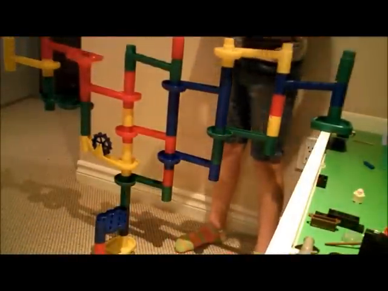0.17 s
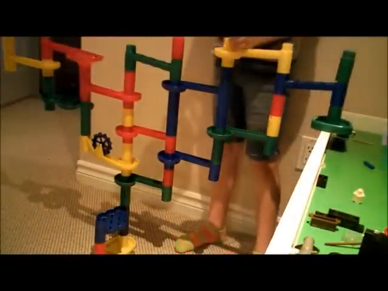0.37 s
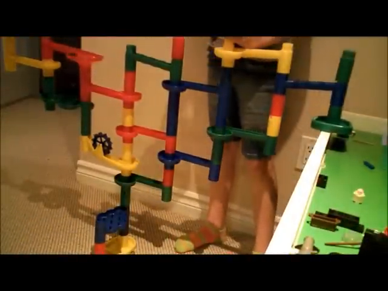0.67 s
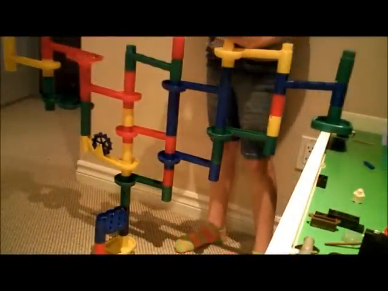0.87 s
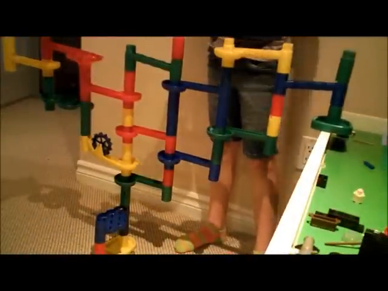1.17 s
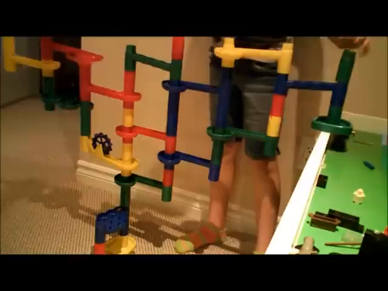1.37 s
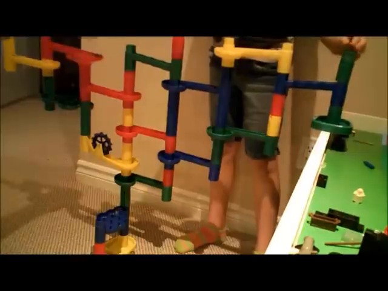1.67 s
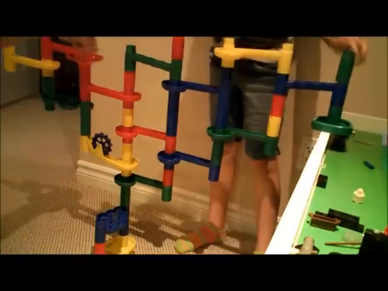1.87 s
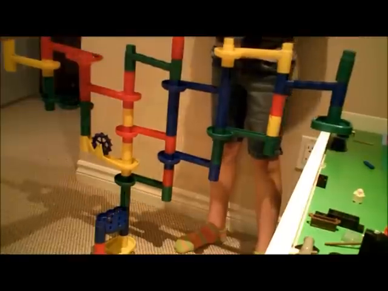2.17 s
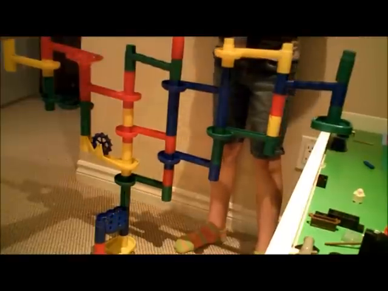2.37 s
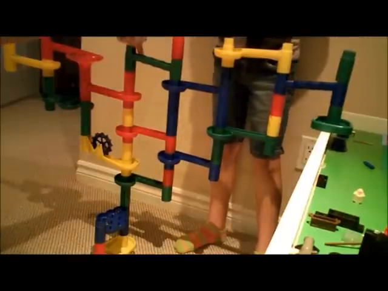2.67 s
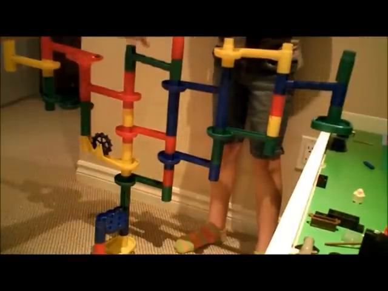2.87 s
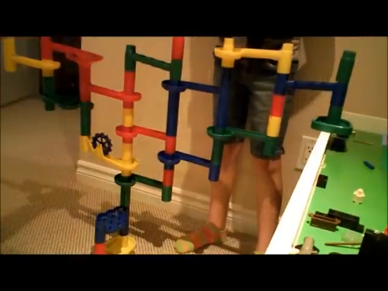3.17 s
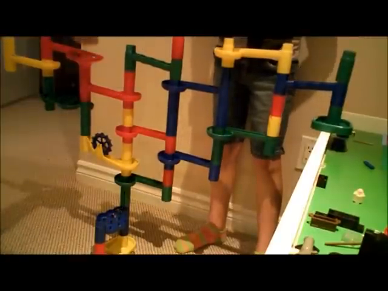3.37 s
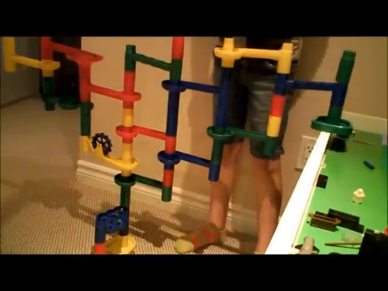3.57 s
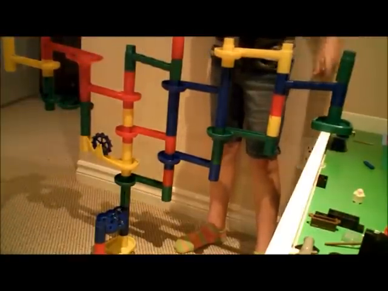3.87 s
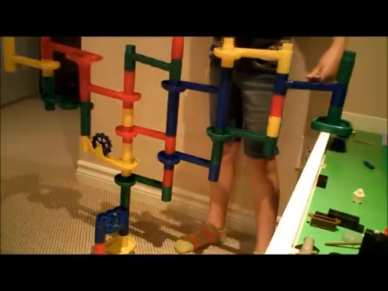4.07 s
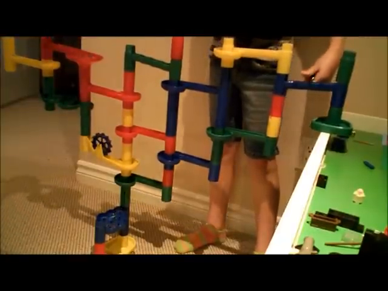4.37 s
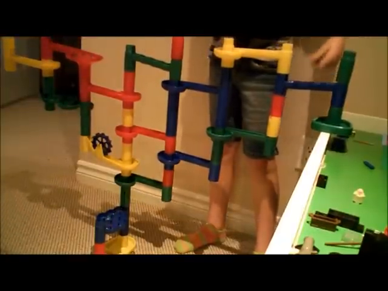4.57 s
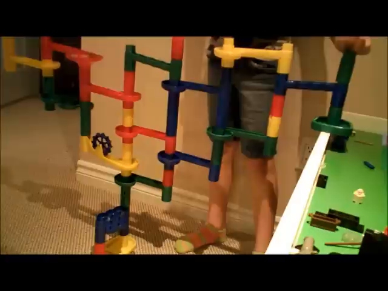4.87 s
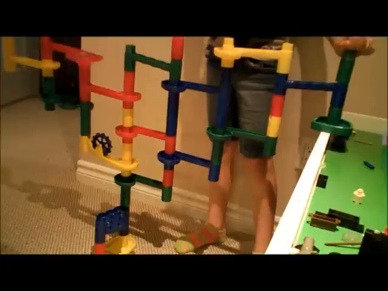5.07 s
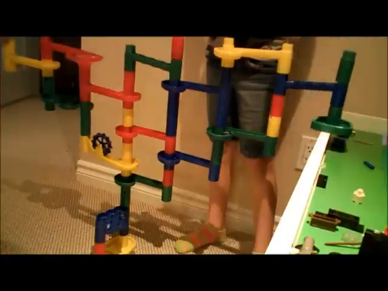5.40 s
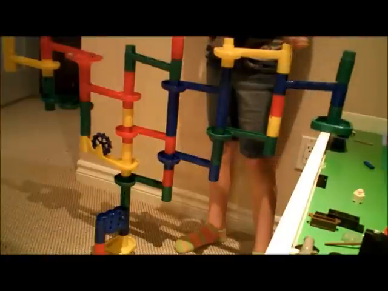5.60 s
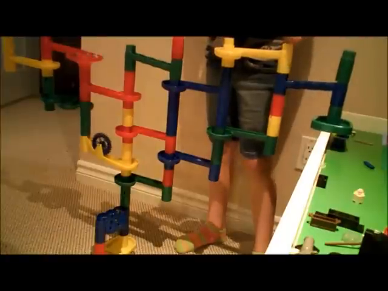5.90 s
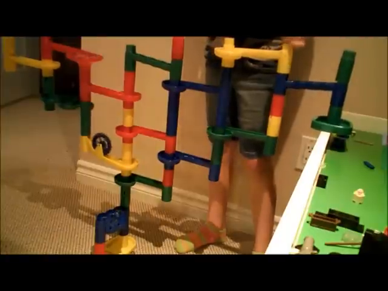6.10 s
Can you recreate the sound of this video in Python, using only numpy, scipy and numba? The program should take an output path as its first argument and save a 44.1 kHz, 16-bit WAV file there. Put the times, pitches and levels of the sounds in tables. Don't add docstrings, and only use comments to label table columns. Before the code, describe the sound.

Several glass marbles tumble through a hollow plastic run indoors. Brief clicks open quietly, then bursts of hard clacks, short rolling rattles and hollow pops gather from about one second. A marble whirs around a funnel midway, a tiny joint squeak comes later, and clatter thickens toward the end. Small carpeted room, camera microphone a couple of metres away, bright and short-echoed.

```python
import sys
import numpy as np
from scipy import signal
from scipy.fft import rfft, irfft
from scipy.io import wavfile
from scipy.ndimage import uniform_filter1d
from numba import njit

SR = 44100
rng = np.random.default_rng(int(sys.argv[2]) if len(sys.argv) > 2 else 0)


def how_loud(loudness_db):
    steps = np.asarray(loudness_db, float) / 20
    return 10 ** steps


def pcm_store(signal):
    levels = np.round(np.clip(np.atleast_2d(signal), -1, 1) * 32767)
    wavfile.write(sys.argv[1], SR, levels.astype(np.int16).T)


N = 275184


def read(table, hz):
    f, v = np.transpose(table)
    return np.interp(np.log(np.maximum(hz, 1)), np.log(f), v)


def curve(table):
    s, *cols = np.transpose(table)
    return [np.interp(np.arange(N) / SR, s, c) for c in cols]


def samples(s):
    return (s * SR).astype(np.int64)


def during(table):
    t = np.arange(N) / SR
    return (t > table[0][0]) * (t < table[-1][0])


def colour(x, table):
    gain = how_loud(read(table, np.fft.rfftfreq(len(x), 1 / SR)))
    y = irfft(rfft(x) * gain, len(x))
    return y / np.std(y)


@njit
def svf(x, hz, width):
    y, b, l = np.empty(len(x)), 0., 0.
    for i in range(len(x)):
        g, k = np.tan(np.pi * hz[i] / SR), width / hz[i]
        v = (b + g * (x[i] - l)) / (1 + g * (g + k))
        b, l, y[i] = 2 * v - b, l + 2 * g * v, k * v
    return y


@njit
def ring(start, hz, gain, t60, rise):
    y = np.zeros(N)
    for k in range(len(hz)):
        p = np.exp(2j * np.pi * hz[k] / SR - np.log(1000) / (t60[k] * SR))
        z, lag, q = gain[k] + 0j, 1., np.exp(-1 / (rise[k] * SR))
        for i in range(start[k], min(N, start[k] + int(t60[k] * SR))):
            z, lag = z * p, lag * q
            y[i] += z.imag * (1 - lag)
    return y


def bounces(s, gap, count):
    steps = gap * (.3 + 1.4 * rng.random((len(s), count)))
    return np.cumsum(steps, 1) - steps[:, :1]


def piece(s, db, bounce, lo_hz, hi_hz, cycles, rise, count):
    bounce_db_per_s = 420
    where, size, pick, long = np.moveaxis(rng.random((len(s), 4, count)), 1, 0)
    hz = lo_hz * (hi_hz / lo_hz) ** ((np.arange(count) + where) / count)
    which = (pick ** 1.5 * bounce.shape[1]).astype(int)
    late = np.take_along_axis(bounce, which, 1)
    start = samples(s[:, None] + late)
    gain = how_loud(db[:, None] - 9 * size - bounce_db_per_s * late) / np.sqrt(count)
    t60 = cycles / hz * (.5 + long)
    flat = [a.ravel() for a in (start, hz, gain, t60)]
    return ring(*flat, np.full(hz.size, rise))


def chatter(rate, spread_db):
    hit = rng.random(N) < rate / SR
    strength_db = spread_db * np.minimum(rng.exponential(size=N), 3)
    return hit * rng.choice([-1, 1], N) * how_loud(strength_db)


# (frequency [Hz], density [dB per Hz])
AIR_SPECTRUM = [(20, -43), (120, -10.5), (300, -2), (1500, -10), (5000, -48), (10000, -40), (16000, -50)]


def air():
    return how_loud(-66.5) * colour(rng.standard_normal(N), AIR_SPECTRUM)


# (time [s], pitch [Hz], level [dB])
SQUEAK_PATH = [
    (4.281, 1092, -53),
    (4.289, 1054, -42),
    (4.305, 1090, -37),
    (4.314, 1090, -42),
    (4.33, 1116, -54),
    (4.34, 1080, -63),
]
# (multiple of pitch, level [dB])
SQUEAK_HARMONICS = [(1, 0), (2, -6), (3, -19), (4, -18), (6, -34), (7, -33), (8, -33)]


def squeak():
    hz, db = curve(SQUEAK_PATH)
    wobble = uniform_filter1d(rng.standard_normal((9, N)), 130) * np.sqrt(130)
    phase = 2 * np.pi * np.cumsum(hz * (1 + .012 * wobble[0])) / SR
    stack = sum(how_loud(g + 3 * wobble[k]) * np.sin(k * phase) for k, g in SQUEAK_HARMONICS)
    return stack * how_loud(db) * during(SQUEAK_PATH)


# (time [s], peak level [dB])
THUD_BLOWS = [
    (2.066, -42),
    (2.099, -61),
    (2.4492, -33.5),
    (4.922, -48.5),
    (5.27, -41),
]


def thud():
    s, db = np.array(THUD_BLOWS, float).T
    knock = piece(s, db + 6.0, bounces(s, .002, count=1), 330, 620, 8, .0007, count=10)
    shudder = piece(s + .016, db + 7, bounces(s, .01, count=4), 240, 560, 11, .002, count=24)
    no_bass = signal.butter(4, 200, "high", fs=SR, output="sos")
    return signal.sosfilt(no_bass, knock + shudder)


# (time [s], level [dB])
SCRAPE_LEVEL = [
    (2.5, -74),
    (2.53, -49.5),
    (2.62, -47.5),
    (2.72, -51),
    (2.8, -49.5),
    (2.95, -52.5),
    (3.15, -60),
    (3.3, -71),
]
# (frequency [Hz], density [dB per Hz])
WALL_SPECTRUM = [(1500, -20), (3000, 0), (6000, -1), (9000, -3), (11000, -9), (13000, -20)]


def scrape():
    return colour(chatter(2600, 4.4), WALL_SPECTRUM) * how_loud(curve(SCRAPE_LEVEL)[0]) * during(SCRAPE_LEVEL)


# (time [s], level [dB])
FUNNEL_LEVEL = [
    (2.5, -49),
    (2.7, -26),
    (2.9, -54),
    (3.14, -36),
    (3.3, -38),
]


def funnel():
    t = np.arange(N) / SR
    hz = 1090. * (1 + 0.016 * np.sin(2 * np.pi * 5.8 * t))
    cone = svf(chatter(400, 4.6), hz, 67)
    return cone * during(FUNNEL_LEVEL) * how_loud(curve(FUNNEL_LEVEL)[0] - 6.0) / np.std(cone)


# (time at full speed [s], chatter level [dB], hold [s])
RAIL_RUSHES = [(0.0, -38.5, 0.012), (0.41, -51.5, 0.027), (0.781, -31, 0.0091), (0.992, -31, 0.029),
               (1.083, -30, 0.02), (1.46, -40, 0.035), (1.663, -43, 0.033), (1.863, -44, 0.1),
               (2.057, -34.5, 0.1), (2.217, -43, 0.26), (2.536, -36, 0.029), (2.632, -31, 0.12),
               (2.944, -34, 0.023), (3.059, -31, 0.082), (3.19, -32, 0.018), (3.491, -35, 0.044),
               (3.633, -37.5, 0.025), (3.876, -37, 0.024), (4.162, -37.5, 0.017), (4.454, -37, 0.09),
               (4.715, -35.5, 0.026), (4.847, -48, 0.043), (5.11, -37, 0.072), (5.258, -31.5, 0.069),
               (5.616, -34.5, 0.015), (5.701, -32, 0.034), (5.807, -41.5, 0.026), (5.912, -28.5, 0.03),
               (6.152, -35, 0.03)]
# (time [s], level [dB])
MURMUR_LEVEL = [(0., -36.5), (.3, -52), (.6, -47), (1.3, -48.5), (1.9, -42.5), (2.4, -44), (2.9, -36.5),
                (3.4, -47), (4.05, -46.5), (4.3, -49.5), (4.95, -45), (5.5, -46), (6.24, -42.5)]


def rush():
    rise_db_per_s, fall_db_per_s, still_db = 289, 234, -92
    t, power = np.arange(N) / SR, how_loud(2 * still_db)
    for s, db, hold in RAIL_RUSHES:
        rise = rise_db_per_s * np.maximum(s - t, 0)
        fall = fall_db_per_s * np.maximum(t - s - hold, 0)
        power = power + how_loud(2 * (db - rise - fall))
    rail_db = 10 * np.log10(power)
    size = int(.03 * SR)
    wobble = uniform_filter1d(uniform_filter1d(rng.standard_normal(N), size), size)
    murmur_db = curve(MURMUR_LEVEL)[0] + 2.5 * wobble / np.std(wobble)
    drum_db = -39 + 0.82 * (rail_db + 38.0)
    return rail_db, 10 * np.log10(how_loud(2 * drum_db) + how_loud(1.98 * murmur_db))


HOLLOW_MODES = (330., 560., 800., 1150., 1500., 1900.)


def patchy(x):
    patch_db, size = 2., int(.025 * SR)
    walk = rng.standard_normal((len(HOLLOW_MODES), N))
    walk = uniform_filter1d(uniform_filter1d(walk, size), size)
    gain = how_loud(patch_db * walk / np.std(walk) - .4) - 1
    return x + sum(g * svf(x, np.full(N, hz), hz / 3.4) for g, hz in zip(gain, HOLLOW_MODES))


# (frequency [Hz], density [dB per Hz])
RAIL_SPECTRUM = [(880, -12), (1500, 13), (1900, 12.5), (4320, 5), (7670, -16.5), (11000, -8), (14900, -15),
                 (16000, -16)]
# (frequency [Hz], density [dB per Hz])
HOLLOW_SPECTRUM = [(100, -37.5), (330, -12.5), (560, -1.5), (800, -2), (1400, 3.5), (1850, 0), (2350, -6),
                   (7000, -31.5)]
# (time [s], centre [Hz])
LEAD_TROUGH = [(0.0, 1510), (0.12, 2010), (0.19, 1290), (1.13, 1720), (1.39, 1430), (1.56, 1760),
               (1.89, 1440), (2.08, 1820), (2.61, 1350), (3.09, 1620), (3.13, 1170), (3.46, 1500),
               (4.5, 1280), (4.68, 1600), (5.06, 1360), (5.09, 1800), (5.44, 1520), (6.24, 1600)]


def rolling():
    rail_db, hollow_db = rush()
    end = (N - 1) / SR - .05
    s = np.sort(rng.random(900)) * end
    db = 4.5 * rng.standard_normal(len(s)).clip(-2, 1.6)
    knocks = piece(s, db, bounces(s, .002, count=2), 2000, 11000, 20, .0002, count=10)
    rails = colour(chatter(9000, 1.5), RAIL_SPECTRUM) + how_loud(-5.5) * knocks / np.std(knocks)
    s = np.sort(rng.random(700)) * end
    db = 4 * rng.standard_normal(len(s)).clip(-2, 1.6)
    drums = piece(s, db, bounces(s, .003, count=2), 600, 2400, 14, .001, count=6)
    troughs = colour(chatter(3000, 1.36), HOLLOW_SPECTRUM) + how_loud(-11.0) * drums / np.std(drums)
    lead = how_loud(-7.5) * svf(troughs, curve(LEAD_TROUGH)[0], 860)
    return how_loud(rail_db - 10.5) * rails + how_loud(hollow_db - 5.5) * patchy(troughs + lead) + funnel()


# (time [s], peak level [dB])
FAR_CLICKS = [(.342, -61), (.5094, -52), (.6594, -48), (.6768, -46), (1.18, -40), (1.272, -41),
              (1.806, -35.5), (1.945, -39), (2.013, -35.5), (2.409, -32), (2.485, -30), (2.4935, -35),
              (3.01, -24.5), (3.3574, -36), (3.43, -38), (3.453, -47), (3.795, -39), (3.848, -39),
              (4.097, -46), (4.131, -55), (4.254, -34), (4.4141, -31), (4.922, -43.5), (5.408, -40),
              (5.48, -39), (5.829, -31), (6.02, -36), (2.3725, -51), (0.806, -27), (1.68, -32.5),
              (1.691, -45), (1.73, -33), (1.852, -46), (3.181, -36), (3.395, -42), (0.732, -43),
              (5.868, -31), (1.047, -39), (2.603, -27), (4.196, -31), (4.229, -35), (4.527, -27),
              (5.041, -42), (5.762, -31.5), (5.9994, -34)]


def clicks():
    s, db = np.array(FAR_CLICKS, float).T
    return piece(s, db + 10, bounces(s, 0.003, count=2), 3370, 9300, 14, 0.0004, count=30)


# (time [s], peak level [dB])
GLANCING_TICKS = [(0.0562, -29.5), (0.1974, -50), (0.299, -45), (0.91, -27.5), (1.451, -40), (1.8614, -36),
                  (2.0426, -20.5), (2.18, -33), (2.59, -30), (2.807, -20.5), (2.81, -15), (3.231, -29),
                  (3.523, -38), (3.547, -33), (3.7523, -53), (3.943, -46), (4.003, -44), (4.4537, -44),
                  (4.4603, -32), (4.7107, -19), (4.802, -35), (5.158, -31), (5.223, -28), (5.4345, -40),
                  (5.55, -36), (5.638, -35), (5.6844, -20.5), (5.6946, -35), (5.919, -32), (5.932, -21.5),
                  (5.974, -33)]


def ticks():
    s, db = np.array(GLANCING_TICKS, float).T
    return piece(s, db + 11.5, bounces(s, 0.0021, count=2), 2715, 11340, 36.0, 0.0011, count=30)


# (time [s], peak level [dB])
GLASSY_GLINTS = [(0.1171, -42), (0.3651, -50), (0.399, -44), (0.581, -44), (0.6848, -42), (0.7477, -23.5),
                 (0.7871, -27), (0.9073, -27), (0.977, -18), (1.0146, -19), (1.0655, -22), (1.0794, -30),
                 (1.4556, -46), (1.5668, -33), (1.729, -31), (1.8614, -25), (1.9061, -41), (1.9445, -35),
                 (2.0123, -35), (2.0418, -25), (2.0587, -12), (2.2306, -33), (2.604, -21), (2.6274, -30),
                 (2.7028, -21), (2.816, -13), (2.929, -20), (2.9417, -23), (3.039, -20), (3.1855, -19),
                 (3.3308, -31), (3.4635, -33), (3.4825, -38), (3.5623, -38), (3.5817, -21), (3.7514, -42),
                 (3.8483, -33), (3.8766, -29), (4.0033, -29), (4.1356, -25), (4.255, -32), (4.336, -36),
                 (4.4139, -34), (4.4613, -32), (4.541, -21), (4.6638, -30), (4.686, -34), (4.6972, -16.5),
                 (5.064, -31), (5.1085, -20), (5.24, -27), (5.2594, -15.5), (5.418, -26.5), (5.5897, -36),
                 (5.62, -29), (5.6386, -30), (5.6845, -30), (5.902, -19.5), (6.137, -26), (6.1509, -18)]


def glints():
    s, db = np.array(GLASSY_GLINTS, float).T
    return piece(s, db + 2, bounces(s, 0.0018, count=3), 6500, 12500, 26, 0.0003, count=24)


# (time [s], peak level [dB])
GLASS_REBOUNDS = [(0.0538, -48), (0.6834, -30), (0.7165, -33), (0.766, -21), (0.7884, -18), (1.0314, -28),
                  (1.0797, -11), (1.204, -47), (1.459, -23), (1.531, -41), (1.593, -39), (2.036, -23),
                  (2.1112, -36), (2.12, -37), (2.2231, -32), (2.4388, -30.5), (2.5836, -22),
                  (2.9454, -16.5), (3.012, -31), (3.0573, -23), (3.091, -34), (3.486, -19), (3.611, -26),
                  (3.7356, -36), (3.879, -26), (3.9423, -34), (4.1525, -20.5), (4.1795, -27),
                  (4.286, -30.5), (4.4139, -47), (4.422, -30), (4.444, -27), (4.463, -30), (4.567, -25.5),
                  (4.7, -10.5), (4.7505, -20.5), (4.762, -35), (4.8414, -29.5), (5.0993, -31), (5.148, -26),
                  (5.159, -35), (5.225, -40), (5.2427, -36), (5.302, -27), (5.3323, -29), (5.362, -32),
                  (5.4176, -44), (5.512, -38), (5.5893, -27), (5.6215, -38), (5.64, -36), (5.6938, -27),
                  (5.722, -27), (5.7638, -31), (5.8007, -26), (5.917, -24), (5.9733, -32), (6.1397, -20),
                  (6.1516, -11.5), (6.1654, -15)]


def rebounds():
    s, db = np.array(GLASS_REBOUNDS, float).T
    return piece(s, db + 6.5, bounces(s, 0.0014, count=3), 2400, 11100, 20, 0.0003, count=40)


# (time [s], peak level [dB], pitch [Hz])
COLUMN_NOTES = [(0.748, -28.5, 1740), (0.972, -23, 1475), (0.989, -17, 1746), (1.078, -16.5, 1590),
                (1.566, -23, 1880), (2.064, -15, 1920), (2.109, -16, 1910), (2.24, -21, 1620),
                (2.625, -20, 1110), (2.817, -19.5, 1680), (2.859, -20.5, 1152), (2.943, -24, 1750),
                (2.965, -19.5, 1080), (3.06, -18, 1740), (2.532, -25, 1140), (2.572, -39, 1170),
                (3.14, -19, 1115), (3.23, -25, 1390), (3.484, -20.5, 1740), (3.582, -26, 1080),
                (3.877, -25, 1493), (4.147, -21.5, 1114), (4.164, -26, 1360), (3.929, -24, 1560),
                (4.698, -17.5, 1780), (5.109, -20, 1920), (5.244, -26, 1900), (5.267, -20, 1780),
                (5.314, -21.5, 1494), (5.697, -18.5, 1670), (5.79, -20, 1390), (5.811, -25, 1410),
                (5.858, -32.5, 1294), (5.89, -18, 1740), (5.911, -20, 1820), (5.935, -21, 1790),
                (5.975, -26, 1630), (6.135, -20, 1466)]
# (time [s], peak level [dB], pitch [Hz], t60 [s])
LONG_RINGS = [(3.877, -33, 4960, 0.045), (3.885, -52, 4935, 0.2), (3.885, -52, 5010, 0.16),
              (3.979, -49, 4990, 0.11), (5.26, -28, 4340, 0.041), (5.809, -33, 1440, 0.063),
              (5.924, -26.5, 1780, 0.099), (0.366, -49, 625, 0.2), (0.415, -54, 615, 0.15),
              (0.581, -46, 630, 0.16), (4.7, -36, 720, 0.15), (2.06, -36, 540, 0.12), (5.11, -42, 480, .12)]


def columns():
    s, db, hz = np.array(COLUMN_NOTES, float).T
    pipes = ring(samples(s), hz, how_loud(db + 4), 29 / hz, s * 0 + 0.003)
    s, db, hz, t60 = np.array(LONG_RINGS, float).T
    return pipes + ring(samples(s), hz, how_loud(db), t60, s * 0 + 0.00014)


# (time [s], peak level [dB])
NEAR_SMACKS = [(1.0808, -19), (3.8775, -23), (4.6, -24), (4.699, -20), (4.925, -37), (5.6775, -26),
               (5.7135, -23), (5.9035, -19), (5.918, -21), (6.1515, -20), (3.04, -22), (1.853, -39),
               (5.852, -27), (5.64, -28)]


def smacks():
    s, db = np.array(NEAR_SMACKS, float).T
    return piece(s, db + 9, bounces(s, 0.0012, count=2), 1600, 8000, 12, 0.0003, count=40)


# (time [s], peak level [dB], strongest ring [Hz])
RIM_DROPS = [(0.062, -22, 2250), (0.119, -19.5, 2220), (0.6848, -21.5, 3000), (0.72, -42, 2150),
             (0.8307, -22.5, 3600), (0.908, -21.5, 5770), (0.973, -13, 5300), (1.0691, -10.5, 3700),
             (1.569, -20, 2860), (1.9627, -23.5, 4080), (2.0996, -13.5, 3870), (2.109, -13.5, 2030),
             (2.2303, -15.5, 2880), (2.582, -22, 5600), (2.602, -15.5, 5430), (2.6247, -30, 2040),
             (2.9295, -15, 2550), (3.039, -7.5, 2470), (3.045, -18, 3100), (3.3313, -23.5, 2900),
             (3.877, -12.5, 4800), (4.0082, -24, 2420), (4.1379, -14, 3630), (4.4228, -15, 4040),
             (4.54, -22, 2240), (5.26, -10, 4170), (5.591, -21, 3800), (5.7881, -19, 4700),
             (5.851, -16.5, 2360), (6.1527, -20, 4300)]
# (time [s], peak level [dB], strongest ring [Hz])
JOINT_DROPS = [(0.365, -28.5, 3780), (0.7499, -18, 2820), (0.784, -20, 3340), (0.9772, -14.5, 4600),
               (1.0727, -16, 2060), (1.4565, -13, 3780), (1.6487, -24, 2460), (1.8617, -15.5, 2520),
               (1.906, -13, 2440), (2.058, -7, 4200), (2.3206, -22.5, 2070), (2.8146, -4.5, 4200),
               (3.1392, -16, 2510), (3.1883, -14, 2220), (3.483, -13, 2920), (3.583, -7.5, 3570),
               (3.765, -19.5, 3600), (4.178, -18.5, 3800), (4.665, -25.5, 2480), (5.018, -28, 2630),
               (5.0595, -19.5, 2220), (5.1075, -9, 2150), (5.2387, -19, 2870), (5.302, -13, 2930),
               (5.678, -16, 3570), (5.7106, -15, 4740), (5.879, -23, 2660), (5.9031, -8.5, 2680),
               (6.0498, -27, 2600), (6.1368, -18.5, 3380)]
# (time [s], peak level [dB], strongest ring [Hz])
TROUGH_DROPS = [(0.3999, -29, 2630), (0.4793, -31.5, 2550), (0.5802, -30, 2720), (1.012, -13.5, 3700),
                (1.2067, -22, 3570), (1.409, -28.5, 4450), (1.576, -17.5, 4860), (1.725, -28.5, 2800),
                (2.0357, -19, 3800), (2.2612, -18, 2870), (2.5222, -21, 3000), (2.6474, -18.5, 2100),
                (2.7049, -11, 2100), (2.9406, -17, 3700), (3.261, -21, 2320), (3.463, -24, 2960),
                (3.5636, -21, 2370), (3.979, -27.5, 5000), (4.335, -24, 2640), (4.3689, -24.5, 2730),
                (4.472, -21, 2420), (4.4868, -15, 2420), (4.564, -21.5, 2460), (4.6994, -21, 2720),
                (4.7502, -21.5, 2950), (4.8422, -34, 3000), (5.1473, -44, 2160), (5.364, -25, 1880),
                (5.543, -24, 2920), (5.6204, -16.5, 2100)]
# (low body re peak [dB], bright snap re peak [dB])
PLACE_COLOURS = [
    (-12.5, -32),
    (-13.5, -30.5),
    (-5, -30.5),
]


def drops():
    places = []
    for table, (body_db, snap_db) in zip((RIM_DROPS, JOINT_DROPS, TROUGH_DROPS), PLACE_COLOURS):
        s, db, hz = np.array(table, float).T
        late = bounces(s, .0045, count=6)
        crack = piece(s, db + 7.0, late, 2320, 6910, 20.7, 0.00079, count=72)
        snap = piece(s, db + snap_db + 23, late, 6900, 12400, 28, .0003, count=60)
        body = piece(s, db + body_db + 15.5, late, 1042, 2234, 17.7, 0.002, count=30)
        main = ring(samples(s), hz, how_loud(db - 18), 40 / hz, s * 0 + 0.0006)
        places.append(crack + snap + body + main)
    return places


def even(echo):
    h = rfft(echo)
    fine, broad = (uniform_filter1d(np.abs(h) ** 2, int(hz * len(echo) / SR)) for hz in (50, 2500))
    c = irfft(np.log(broad / fine) / 2, len(echo))
    c[1:len(c) // 2] *= 2
    c[len(c) // 2:] = 0
    return irfft(h * np.exp(rfft(c)), len(echo))


# (frequency [Hz], t60 [s])
ROOM_DECAY = [(200, 0.35), (1500, 0.35), (5000, 0.2), (12000, 0.034)]


def room(x):
    t = np.arange(int(.6 * SR)) / SR
    tail = 0
    for hz in 125 * 2. ** np.arange(8):
        band = svf(rng.standard_normal(len(t)), t * 0 + hz, hz * .8)
        tail = tail + band * how_loud(-60 * t / read(ROOM_DECAY, hz))
    tail *= 1 - np.exp(-t / 0.001)
    early = (rng.random(len(t)) < 700 / SR) * rng.standard_normal(len(t)) * np.exp(-t / 0.0042)
    echo = how_loud(-4.5) * tail / np.linalg.norm(tail) + how_loud(1) * early / np.linalg.norm(early)
    echo[0] += 1
    return signal.fftconvolve(x, even(echo))[:N]


def travelling(x):
    turn = np.pi * 1.7 * np.arange(N) / SR
    return sum(room(x * np.cos(turn + k * np.pi / 3) ** 2 / 1.5) for k in range(3))


def scene():
    rim, joint, trough = drops()
    near = thud() + squeak()
    places = (rim + columns(), joint + ticks(), trough + clicks() + glints())
    moving = travelling(rolling() + rebounds() + scrape())
    fixed_places = sum(room(p + how_loud(-11) * near) for p in places)
    return (fixed_places + moving + how_loud(-5) * near + smacks() + air())[None]


def top_cut(x):
    return signal.sosfilt(signal.butter(12, 15800, fs=SR, output="sos"), x)


# (frequency [Hz], gain [dB])
MIC_RESPONSE = [(100, -2.5), (1000, -2.5), (6000, 8.5), (9000, 6), (12000, 1), (13200, -5), (15500, -7)]


def record(dry):
    rumble = signal.butter(2, [15, 110], "band", fs=SR, output="sos")
    swell = signal.sosfilt(rumble, dry * rng.standard_normal(N))
    tone = irfft(rfft(dry) * how_loud(read(MIC_RESPONSE, np.fft.rfftfreq(N, 1 / SR))), N)
    ceiling = .55
    rounded = ceiling * np.tanh(tone / ceiling)
    low_pass = signal.ellip(8, .2, 60, 15650, fs=SR, output="sos")
    mix = signal.sosfilt(low_pass, rounded + how_loud(-28) * swell)
    return top_cut(mix)


dry = scene()
out = record(dry)
pcm_store(out)
```